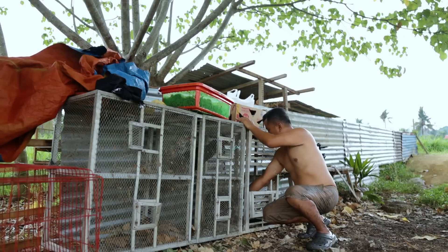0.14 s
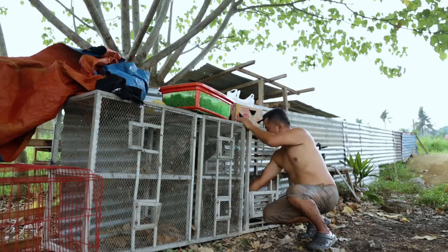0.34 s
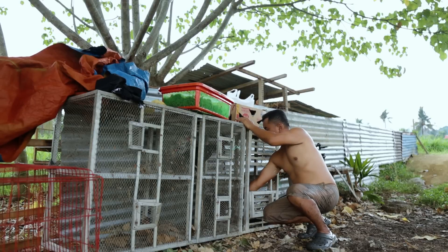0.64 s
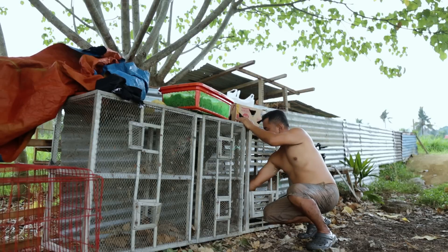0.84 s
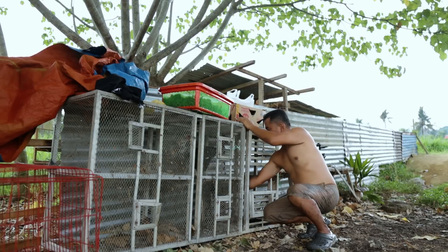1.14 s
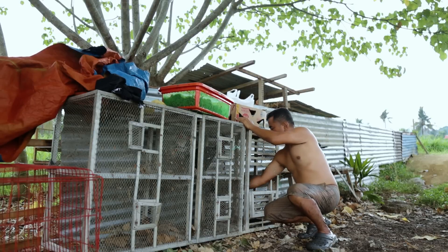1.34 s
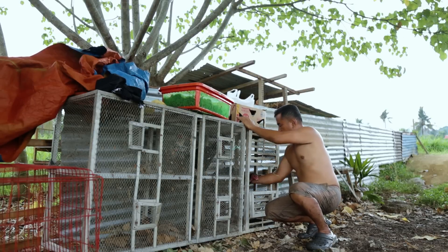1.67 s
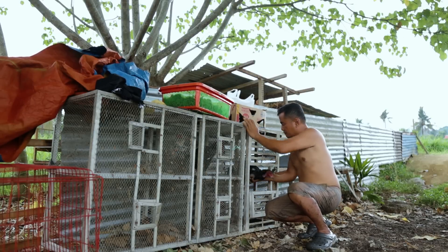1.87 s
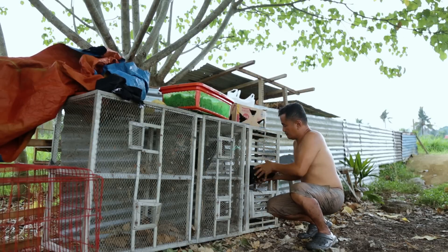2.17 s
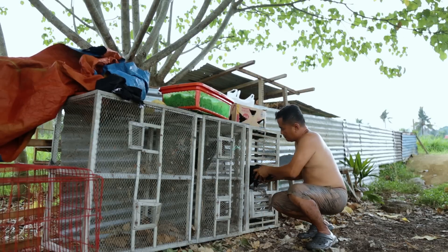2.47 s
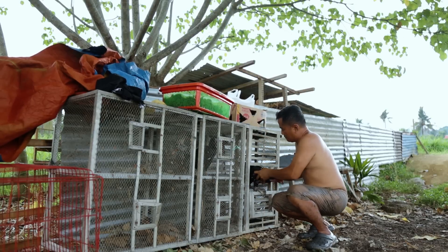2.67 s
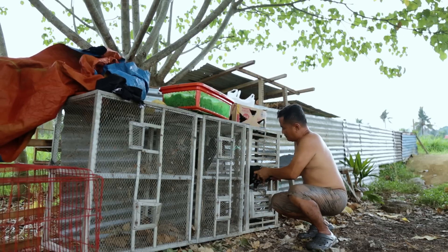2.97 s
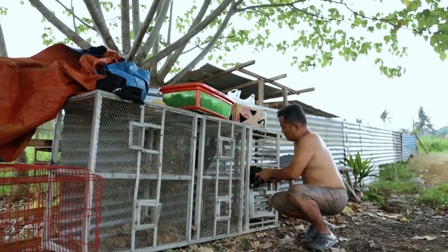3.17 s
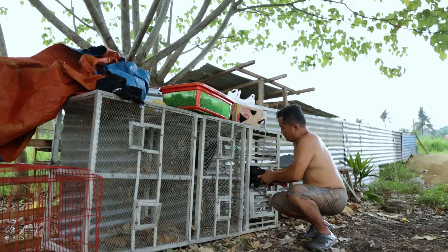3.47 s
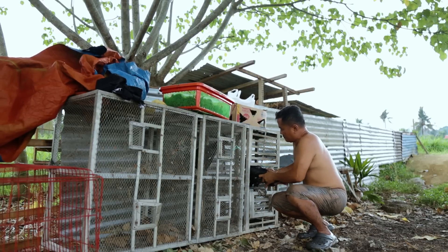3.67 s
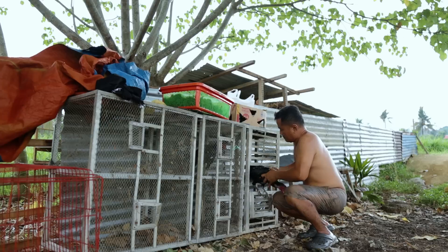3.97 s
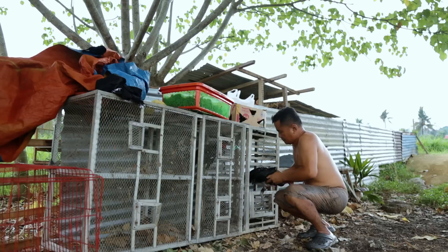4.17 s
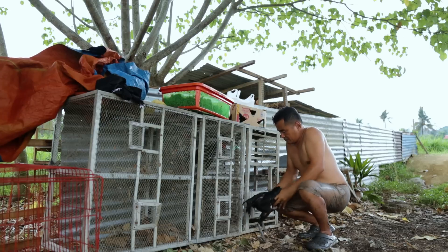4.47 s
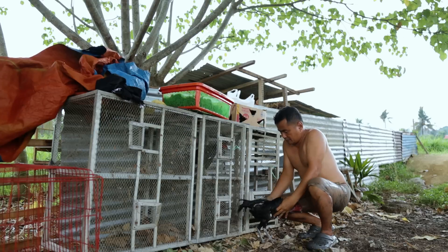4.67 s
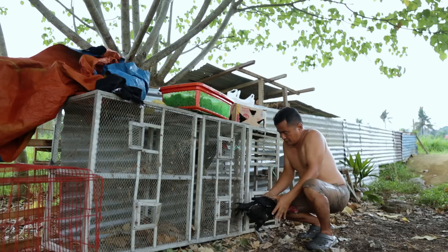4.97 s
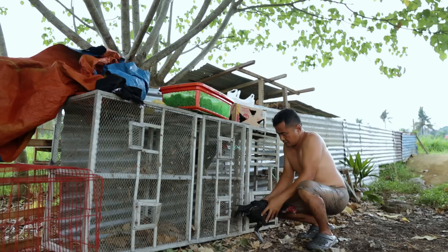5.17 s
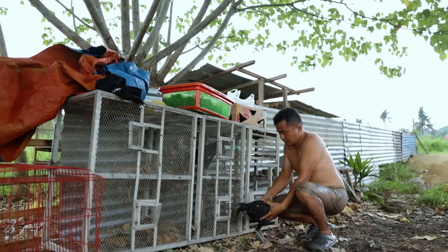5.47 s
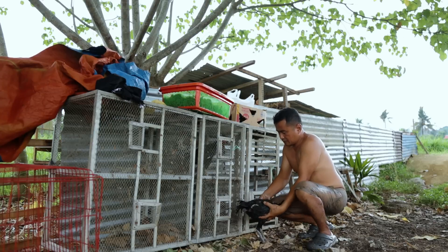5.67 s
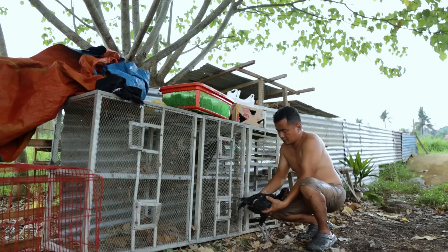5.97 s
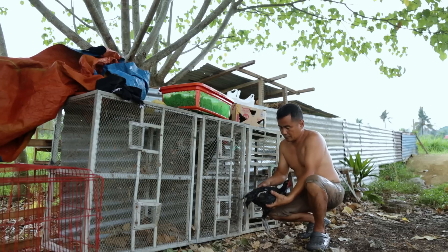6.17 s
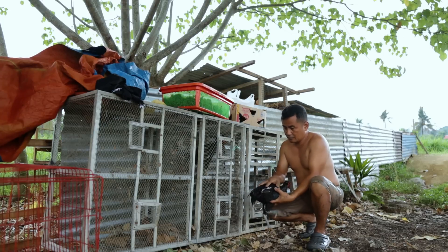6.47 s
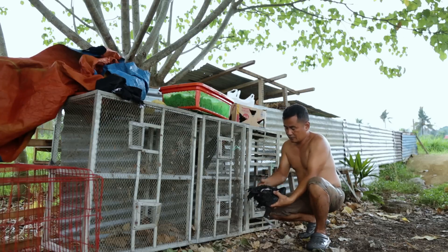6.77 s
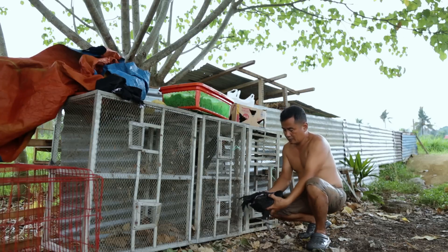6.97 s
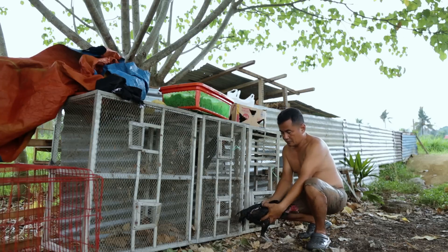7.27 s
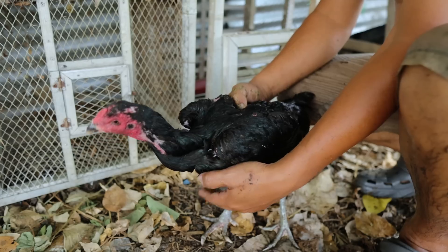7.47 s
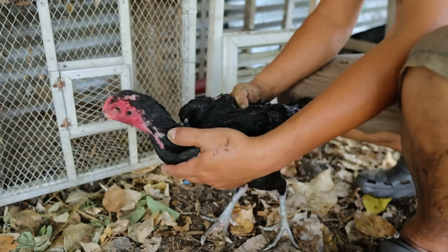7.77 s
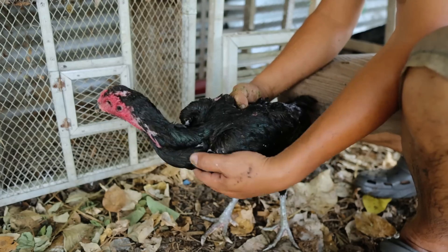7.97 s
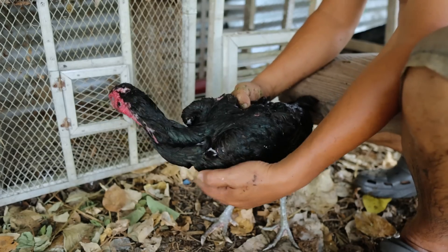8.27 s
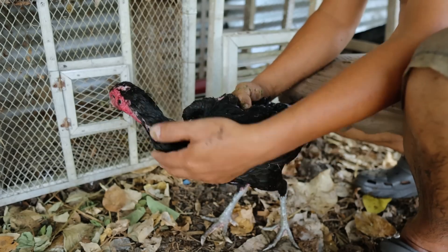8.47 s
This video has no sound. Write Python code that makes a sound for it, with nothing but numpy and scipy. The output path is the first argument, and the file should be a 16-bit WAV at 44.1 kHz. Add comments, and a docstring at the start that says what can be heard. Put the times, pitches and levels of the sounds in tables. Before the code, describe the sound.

Open farmyard with a soft hush and faint low gusts at the microphone. At 0.1 s a strong dull knock sounds on a coop frame, with low hen grumbles, a faint cluck and a distant songbird phrase. More knocks come at 0.5 s. From 0.6 s short squawks begin, with scraping feathers and feet, growing by 1.2 s into louder rasping squawks several times a second, many led by a thin whistle. Bright mesh clicks rattle around 1, 2.1, 3.9 and 4.1 s. From 4.8 to 5.2 s come low grumbles and a cluck, then a long squawk at 5.3 s over far rasping chatter. Clucks follow at 5.9 and 6.1 s, leaves brush at 6.3 s, and two joined hoarse squawks sound at 6.5 s. Knocks come around 7.1 to 7.4 s. Finally, drier close clucks and one tiny squawk mix with other fowl and high chirps until 8.6 s.

```python
"""Knocks and low grumbles open the scene as a chicken is pulled out of a wire-mesh coop and held by hand.
It soon breaks into rasping squawks, many led by a whistle, among mesh clicks and rustling feathers,
then gives short clucks between later squawks while leaves brush and other birds call across the yard.
Its voice is source and filter: a syrinx buzz with a second, slower vibration drives throat and beak.
Contacts are filtered impulses with rattle, rustles clumped noise, other calls gliding harmonics."""
import sys
import numpy as np
from scipy import signal
from scipy.io import wavfile
from scipy.ndimage import uniform_filter1d, map_coordinates

SR = 44100
rng = np.random.default_rng(int(sys.argv[2]) if len(sys.argv) > 2 else 0)


def int16_out(signal):
    """Quantize to a 16-bit WAV file."""
    q = np.round(np.clip(np.atleast_2d(signal).T, -1, 1) * 32767)
    wavfile.write(sys.argv[1], SR, q.astype(np.int16))


N = 380141
EDGE_HZ = 15900  # upper edge of the whole band


def gain_of(db):
    """Level definition: decibels to amplitude ratio."""
    return 10 ** (np.asarray(db) / 20)


def evened(x):
    """Normalisation: scales a signal to rms 1."""
    return x / np.sqrt(np.mean(x ** 2) + 1e-20)


def read(points, hz):
    """Interpolation: reads a spectrum table on a log-frequency axis."""
    f, value = np.transpose(points)
    return np.interp(np.log(hz + 1), np.log(f), value)


def add(mix, s, sound):
    """Superposition: mixes a sound in at time s."""
    part = mix[max(round(s * SR), 0):][:len(sound)]
    part += sound[:len(part)]


def coloured(x, points, size=4096):
    """Minimum phase: a causal filter whose phase follows from its log gain by Hilbert transform."""
    log_gain = np.log(gain_of(read(points, abs(np.fft.fftfreq(size, 1 / SR)))))
    taps = np.fft.ifft(np.exp(np.conj(signal.hilbert(log_gain)))).real
    return signal.fftconvolve(x, taps[:size // 2])[:len(x)]


def wander(count, hz):
    """Random modulation: straight lines between normal deviates drawn hz times a second."""
    knots = rng.standard_normal(count // 8 + 4)
    return map_coordinates(knots, [np.arange(count) * hz / SR], order=1)


def steadied(x, size=400):
    """Level control: divides by the short-time rms so that the level holds at 1."""
    power = uniform_filter1d(uniform_filter1d(x ** 2, size), size)
    return x / np.sqrt(abs(power) + 1e-12)


def faded(x, size=130):
    """Windowing: linear ramps of size samples soften both ends."""
    i = np.arange(len(x))
    return x * np.clip(np.minimum(i, i[::-1]) / size, 0, 1)


def ramp(x):
    """Linear envelope: falls from 1 at x = 0 to nothing at x = 1."""
    return np.clip(1 - x, 0, 1)


def swelling(swells):
    """Cosine-tapered envelope: a level that rises and falls for each (start, end, dB)."""
    swell = np.zeros(N)
    for start, end, db in swells:
        window = signal.windows.tukey(max(int((end - start) * SR), 2), .6)
        add(swell, start, gain_of(db) * window)
    return swell


def resonate(x, hz, width):
    """Heterodyne resonator: shifts hz to zero, low-passes and shifts back, with gain 1 at the peak."""
    turn = np.exp(2j * np.pi * np.cumsum(hz * np.ones(len(x))) / SR)
    r = np.exp(-np.pi * width / SR)
    return 2 * (turn * signal.lfilter([1 - r], [1, -r], x / turn + 1e-18)).real


def crackle(swells, colour, clump_db, grain_db):
    """Friction noise: many small contacts, clumped by slow and fast random level changes."""
    level_db = clump_db * wander(N, 130) + grain_db * wander(N, 1500)
    grains = rng.standard_normal(N) * gain_of(level_db)
    return swelling(swells) * evened(coloured(grains, colour))


def air():
    """Broadband noise: the hush of the yard, and low turbulence of gusts at the microphone."""
    # yard hush: f/Hz, relative level/dB
    hush_colour = [(15, -23), (25, -21), (70, 3), (463, -5), (607, -10), (775, -6.5), (936, 0), (1560, -14),
                   (3520, -13.5), (6380, -25), (7110, -15.5), (7920, -25.5), (9840, -19), (11600, -32),
                   (16000, -41.5)]
    # breeze rumble: f/Hz, relative level/dB
    rumble_colour = [(15, -36), (40, 5.5), (62, -6.5), (90, -27), (200, -38), (600, -69)]
    # gusts: start t/s, end t/s, level/dB before the cut below
    gusts = [(0.52, .8, -43), (1.55, 2.1, -49), (2.1, 2.85, -41), (3.15, 3.6, -45), (4.1, 4.35, -47),
             (5.1, 5.3, -48), (6.12, 6.5, -40), (7.12, 7.44, -39.5), (7.72, 7.92, -43), (8.02, 8.35, -39)]
    calm_db, rumble_cut_db = -56.5, -2.0  # the rumble between gusts is cut too
    hush_db = -45.43 + 2.8 * wander(N, 4.5)
    hush = evened(coloured(rng.standard_normal(N), hush_colour)) * gain_of(hush_db)
    rumble = evened(coloured(rng.standard_normal(N), rumble_colour, size=32768))
    return hush + rumble * (gain_of(calm_db) + swelling(gusts)) * gain_of(rumble_cut_db)


def echoes(x):
    """Specular reflection: single delayed copies off ground, coop and tin fence."""
    # reflections: delay t/s, level/dB
    reflections = [(.0058, -41), (0.0121, -22), (0.019, -24)]
    out = np.zeros(N)
    for delay, db in reflections:
        add(out, delay, gain_of(db) * x)
    return out


def yard_tail(x):
    """Diffuse reverberation: scatter from trees and sheds, each band dying at its own speed."""
    # reverberation time: f/Hz, T60 t/s
    tail_t60 = [(300, 0.12), (1000, 0.19), (4000, 0.21), (12000, 0.07)]
    hz, t, z = signal.stft(rng.standard_normal(SR), SR, nperseg=256)
    build_up = 1 - np.exp(-t / 0.0057)
    z = z * gain_of(-60 * t / read(tail_t60, hz)[:, None]) * build_up
    tail = signal.istft(z, SR)[1]
    return signal.fftconvolve(x, tail / np.linalg.norm(tail))[:N]


def birds(calls, overtone_db, waver, waver_hz):
    """Harmonic series: whistles of randomly wavering pitch, each overtone overtone_db above the last."""
    out = np.zeros(N)
    for s, hz, level_db in calls:
        wavering_hz = hz * (1 + waver * wander(len(hz), waver_hz))
        phase = 2 * np.pi * np.cumsum(wavering_hz) / SR
        tone = sum(gain_of(overtone_db * k) * np.sin((k + 1) * phase) for k in range(4))
        add(out, s, faded(evened(tone) * gain_of(level_db)))
    return out


def notes(rows, edge_db):
    """Quadratic glide: each note bends through three pitches, its level changed by edge_db at the ends."""
    for start, length, first_hz, middle_hz, last_hz, db in rows:
        u = np.linspace(-1, 1, int(length * SR))
        slope_hz = (last_hz - first_hz) / 2
        bend_hz = (first_hz + last_hz) / 2 - middle_hz
        yield start, middle_hz + slope_hz * u + bend_hz * u ** 2, db + edge_db * u ** 2


def phrase(start, db):
    """Frequency glide: a songbird's two flicks and rising slur as start, pitch and level."""
    # the phrase: t/s from its start, pitch f/Hz, relative level/dB
    phrase_points = [(0, 2660, -23), (.015, 3290, 10.5), (.035, 2480, -21), (.056, 3150, 7),
                     (.078, 2100, -10), (.11, 2220, -9), (.155, 2780, 2), (.188, 3000, -18)]
    s, hz, level_db = np.transpose(phrase_points)
    t = np.arange(0, s[-1], 1 / SR)
    return start, np.interp(t, s, hz), db + np.interp(t, s, level_db)


def songbirds():
    """Nearly pure tones: far songbirds' phrases and single chirps."""
    # sung phrases: start t/s, level/dB
    sung_phrases = [(0.309, -49), (5.939, -44.5)]
    # chirps: start t/s, length t/s, first f/Hz, middle f/Hz, last f/Hz, level/dB
    chirps = [(7.265, 0.032, 3200, 2530, 2150, -49), (7.44, 0.088, 5000, 5400, 6500, -64),
              (7.62, .11, 4970, 5420, 6540, -68), (7.86, 0.11, 4970, 5280, 6850, -56),
              (8.2, 0.098, 4900, 5340, 6700, -56.5), (8.52, .098, 4970, 5500, 6500, -59)]
    song = [phrase(*row) for row in sung_phrases] + list(notes(chirps, edge_db=0))
    return birds(song, overtone_db=-39, waver=0.014, waver_hz=400)


def other_fowl():
    """Harmonic tones: steady far fowl, and nearer fowl with a rougher pitch."""
    # far fowl: start t/s, length t/s, first f/Hz, middle f/Hz, last f/Hz, mid-note level/dB
    far_notes = [(0.32, 0.11, 1156, 1138, 1084, -46.5), (6.33, 0.96, 934, 977, 957, -44),
                 (7.1, 1.2, 1796, 1720, 1680, -56)]
    # nearer fowl: start t/s, length t/s, first f/Hz, middle f/Hz, last f/Hz, mid-note level/dB
    nearer_notes = [(5.77, .11, 847, 1250, 1340, -47), (7.44, .125, 1295, 1540, 1360, -40),
                    (7.565, 0.09, 1395, 1510, 1386, -36), (7.695, 0.068, 680, 982, 760, -32),
                    (8.04, 0.12, 880, 1273, 1090, -41), (8.35, .045, 1030, 1130, 1300, -41),
                    (8.395, 0.12, 1720, 1628, 1490, -29)]
    far = birds(notes(far_notes, edge_db=-5), overtone_db=-7.0, waver=0.0142, waver_hz=249)
    return far + birds(notes(nearer_notes, edge_db=-8), overtone_db=-15, waver=0.079, waver_hz=620)


def chatter():
    """Band-shaped noise: far rasping bird chatter."""
    # chatter: start t/s, end t/s, level/dB
    bursts = [(4.95, 5.32, -52.5), (5.42, 5.62, -53), (5.66, 5.85, -51)]
    # its spectrum: f/Hz, relative level/dB
    burst_colour = [(2000, -34), (3700, -5), (4700, 5), (5500, 0), (6800, -23), (12000, -47)]
    return crackle(bursts, burst_colour, clump_db=1.5, grain_db=1.5)


def leaves():
    """Friction noise: a brush through dry leaves."""
    # brush: start t/s, end t/s, level/dB
    brushes = [(6.25, 6.37, -32)]
    # its spectrum: f/Hz, relative level/dB
    leaf_colour = [(300, -22), (1000, -19), (1700, 7), (2300, -1.5), (3000, -13), (4500, -11), (7000, -19),
                   (15000, -44)]
    return crackle(brushes, leaf_colour, clump_db=2.5, grain_db=1.5)


def rustles():
    """Friction noise: feathers and feet scraping in the struggle."""
    # scrapes: start t/s, end t/s, level/dB
    scrapes = [(0.604, 0.77, -37), (0.876, 1.02, -30), (1.077, 1.496, -33), (1.475, 1.565, -28.5),
               (1.55, 1.75, -39.5), (1.857, 2.007, -36), (2.04, 2.256, -37), (3.56, 3.76, -42.5),
               (7.4, 7.776, -51), (8.47, 8.53, -33)]
    # their spectrum: f/Hz, relative level/dB
    scrape_colour = [(150, -11.5), (600, -0.5), (1200, 1), (1900, -4), (3000, -2.5), (4400, -4.5),
                     (7000, -18), (15000, -31)]
    return crackle(scrapes, scrape_colour, clump_db=7.0, grain_db=3.5)


def strike(colour, t60, ring, count=9000):
    """Impact excitation: an impulse and an exponentially dying rattle, filtered to peak 1."""
    t = np.arange(count) / SR
    force = ring * rng.standard_normal(count) * gain_of(-60 * t / max(t60, .005))
    force[0] += 1
    sound = coloured(force, colour)
    return sound / abs(sound).max()


def coop():
    """Impact sound: dull knocks on the frame, sharp clicks of claws and wire mesh."""
    # knocks: t/s, peak level/dB before the 4 dB lift, relative treble/dB, T60 t/s
    knocks = [(0.08, -37, 4, 0.03), (0.137, -5, -2.5, 0.034), (0.514, -18.5, -8, 0.035),
              (0.525, -20, -7, 0.018), (2.057, -20, -4, 0.11), (6.025, -29, -1, 0.023),
              (7.134, -19, -8, 0.042), (7.149, -19, 19, 0.012), (7.236, -21, -3, 0.025),
              (7.403, -30, 0, 0.051)]
    # knock spectrum: f/Hz, relative level/dB
    knock_colour = [(80, -27), (200, 0), (450, 9), (700, 1.5), (1000, 12), (1600, -5.5), (3100, -2.5),
                    (4500, -20), (15000, -52)]
    # clicks: t/s, peak level/dB before the 6 dB lift, T60 t/s
    clicks = [(0.546, -38.5, 0.078), (0.9273, -23, 0.035), (0.972, -14, 0.024), (1.491, -26, 0.36),
              (2.0624, -10.5, 0.094), (2.072, -29, 0.089), (2.1276, -28.5, 0.037), (2.1947, -18.5, 0.068),
              (2.3477, -19, 0.12), (3.5376, -22, 0.062), (3.8609, -10.5, 0.039), (3.896, -25.5, 0.07),
              (4.1225, -14, 0.055), (4.1576, -29.5, 0.083), (8.4818, -30, 0.055)]
    # click spectrum: f/Hz, relative level/dB
    click_colour = [(300, -4.5), (1000, 4), (2000, -1.5), (4100, 9), (5600, 8), (7500, -7), (10500, -7),
                    (15000, -20.5)]
    out = np.zeros(N)
    for s, db, treble_db, t60 in knocks:
        colour = [(hz, level + treble_db * (hz > 1500)) for hz, level in knock_colour]
        add(out, s, gain_of(db + 4) * strike(colour, t60, ring=0.194))
    for s, db, t60 in clicks:
        add(out, s, gain_of(db + 6) * strike(click_colour, t60, ring=0.51))
    return out


def syrinx(hz, rasp):
    """Coupled oscillation: membranes buzz; with rasp a slower vibration joins and drifts out of step."""
    count = len(hz)
    warble = .055 * (rasp + .15) * wander(count, 110)
    jitter = 0.067 * (rasp + 0.17) * wander(count, 482.0)
    turns = np.cumsum(hz * (1 + warble + jitter)) / SR
    buzz = sum((k * hz < EDGE_HZ) * np.cos(2 * np.pi * k * turns) for k in range(1, 44))
    # locked at half the pitch it makes cycles strong-weak; unlocked it makes the voice hoarse
    drift_turns = np.cumsum(hz * .5 * rasp ** 2 * wander(count, 90.1)) / SR
    slow_turns = (turns + drift_turns) / 2
    beating = 1.33 * rasp * (1 + 1.07 * wander(count, 114.0)) * np.cos(2 * np.pi * slow_turns)
    shimmer = 0.87 * rasp * wander(count, 412.4)
    pulses = evened(buzz) * (1 + beating + shimmer)
    # turbulent air escapes each time the membranes open
    puffs = evened((0.24 + np.exp(-(turns % 1) / .5)) * rng.standard_normal(count))
    return pulses + (rasp ** 2 + 0.14) * puffs


def scattered(x, share, decay=.003, count=600):
    """Scattering: bars and hands close to the beak smear each pulse over a few milliseconds."""
    taps = rng.standard_normal(count) * np.exp(-np.arange(count) / SR / decay)
    return x + share * signal.fftconvolve(x, taps / np.linalg.norm(taps))[:len(x)]


def throat_mode(drive, hz, stage_width):
    """Cascaded resonance: two equal resonators in series steepen the skirts."""
    return resonate(resonate(drive, hz, stage_width), hz, stage_width)


def hen_call(s, hz, level_db, upper_db, rasp):
    """Source and filter: the syrinx sounds through throat and beak."""
    # fixed modes of windpipe and mouth: f/Hz, half of each stage's width f/Hz, level/dB
    throat_modes = [(610, 130, -6), (2480, 250, -19), (2870, 250, -17), (3220, 300, -10), (3520, 380, -8),
                    (4400, 400, -23), (5000, 400, -20), (5550, 400, -21), (7100, 900, -30)]
    # sound radiated from the beak: f/Hz, relative level/dB
    beak_colour = [(150, -22), (330, -6), (450, -11), (600, -3), (850, 0), (1350, 2), (1800, -2), (2800, 2),
                   (3450, 1), (4150, -5), (5300, -2), (7000, -8), (15000, -13)]
    # the main resonance climbs with pitch up to the squawks and sits lower again for the whistles:
    # pitch f/Hz, resonance f/Hz
    main_tuning = [(280, 580), (420, 590), (520, 900), (610, 970), (700, 1020), (820, 940), (1120, 850)]
    # how the bird is held shapes its throat: t/s, main resonance level/dB, neck resonance level/dB
    posture = [(0, 6, -19), (1.1, -3.5, -7.5), (1.65, -12.5, -10.5), (1.8, 7, -4), (2.5, 2.5, -13),
               (3.6, 8.5, -17.5), (4.5, 5, -15), (5.3, 16, 4), (6.7, 0.5, 0), (7.5, 34, -25)]
    rasp = np.clip(rasp, 0, 1)
    drive = syrinx(hz, rasp)
    main_hz = read(main_tuning, hz)
    held_s, *strengths = np.transpose(posture)
    main_db, neck_db = (np.interp(s, held_s, db) for db in strengths)
    voice = gain_of(main_db) * throat_mode(drive, main_hz, stage_width=660)
    voice += gain_of(neck_db) * throat_mode(drive, 1800, stage_width=600)
    for mode_hz, width, db in throat_modes:
        voice += gain_of(db) * throat_mode(drive, mode_hz, 2 * width)
    voice = coloured(voice, beak_colour)
    # a nearly shut beak passes little above its resonance
    divide_hz = min(1.45 * main_hz.max(), 1550)
    low, high = (signal.sosfiltfilt(signal.butter(5, divide_hz, side, fs=SR, output="sos"), voice)
                 for side in ("low", "high"))
    low, high = scattered(low, share=.35), scattered(high, share=.9)
    # the upper resonances come out as the bird strains
    sound = steadied(low) + gain_of(upper_db) * steadied(high)
    flutter_db = 2.5 * rasp * wander(len(hz), 170)
    return s, faded(sound * gain_of(level_db + flutter_db), size=80)


def grumble_gesture(start, length, hz, db, upper_db):
    """Parabolic envelope: a grumble swells and fades while its pitch sinks a little."""
    edge_db, sag, rasp = -15, 0.104, 0.58  # sag is a share of the pitch
    u = np.arange(0, length, 1 / SR) / length
    return start, hz * (1 - sag * (u - .5)), db + edge_db * (2 * u - 1) ** 2, upper_db, rasp


def cluck_gesture(start, lead, pop, lead_hz, pop_hz, last_hz, db, lead_db, upper_db):
    """Two-stage gesture: a soft lead-in on an arch of pitch drops into a loud pop and dies, falling."""
    onset_s, snap_s, tail_s = .01, .005, .016
    onset_db, tail_db, rasp = -18, -23, 0.12
    crest, bend = .45, 1.8  # share of the lead-in at the highest pitch, exponent of the arch
    scoop = .25  # share of the pitch by which the lead-in starts flat
    length = lead + pop + tail_s
    t = np.arange(0, length, 1 / SR)
    from_crest = abs((np.minimum(t / lead, 1) - crest) / (1 - crest))
    arch_hz = lead_hz * (pop_hz / lead_hz) ** (from_crest ** bend)
    lead_in_hz = arch_hz * (1 - scoop * ramp(t / lead) ** 2)
    hz = np.where(t < lead, lead_in_hz, np.interp(t, [lead, length], [pop_hz, last_hz]))
    level_db = db + onset_db * ramp(t / onset_s) + lead_db * ramp(1 + (t - lead) / snap_s)
    level_db = level_db + tail_db * ramp((length - t) / tail_s)
    return start, hz, level_db, upper_db, rasp


def squawk_gesture(start, length, rise, held_hz, sag, last_hz, db, closing_db, early_db, late_db, rasp):
    """Gliding gesture: a squawk scoops up, holds with a tremble, then swells or dips as its pitch drops."""
    rise_db, rise_dull_db, scoop = -13.5, -22, .2  # it starts soft, dull and flat in pitch
    close_s, close_bend, close_clears = .05, 1.3, 0.35  # pitch drops and clears as the beak closes
    release_s, release_db = .018, -23.5
    droop, droop_s = 0.236, 0.01606  # the pitch collapses as the air runs out
    t = np.arange(0, length, 1 / SR)
    u, left = t / length, length - t
    opening = ramp(t / max(rise, 1 / SR))
    closing = ramp(left / close_s) ** close_bend
    # the pitch takes 1.4 times as long as the level to rise
    pitch_opening = ramp(t / max(1.4 * rise, 1 / SR))
    hz = held_hz * (1 - scoop * pitch_opening ** 2) * (1 - sag * (u - .5))
    hz = hz * (1 + .022 * wander(len(t), 35))
    hz = (hz + (last_hz - hz) * closing) * (1 - droop * ramp(left / droop_s))
    swell_or_dip_db = closing_db * np.exp(-((left - 0.022) / 0.014) ** 2 / 2)
    tremble_db = 1.5 * wander(len(t), 70)
    overshoot_db = 1.5 * np.exp(-((t - rise) / 0.0062) ** 2 / 2)  # as the rise ends
    level_db = db + rise_db * opening + swell_or_dip_db + release_db * ramp(left / release_s)
    level_db = level_db + tremble_db + overshoot_db
    upper_db = early_db + (late_db - early_db) * u + rise_dull_db * opening - swell_or_dip_db / 2
    return start, hz, level_db, upper_db, rasp * (1 - close_clears * closing)


def whistle_gesture(start, length, top_hz, db, upper_db, rasp):
    """Register flip: a whistle scoops up, holds and falls on a shallow arch of pitch."""
    rise_s, fall_s, rise_db, fall_db = .022, 0.0102, -24.5, -7.5
    arch, scoop, swell_db = .06, .08, 2.5  # shares of the pitch; growth from start to end
    t = np.arange(0, length, 1 / SR)
    opening = ramp(t / rise_s)
    hz = top_hz * (1 - arch * (2 * t / length - 1) ** 2) * (1 - scoop * opening ** 2)
    level_db = db + swell_db * (t / length - .5)
    level_db = level_db + rise_db * opening + fall_db * ramp((length - t) / fall_s)
    return start, hz, level_db, upper_db, rasp


def chicken():
    """Superposed gestures: grumbles, clucks, squawks and whistles share one vocal tract."""
    # All levels stand before the 1.68 dB cut; "upper" is the upper resonances' relative level.
    # low grumbles, beak shut: start t/s, length t/s, pitch f/Hz, level/dB, upper/dB
    grumbles = [(0.002, 0.05, 303, -26.5, -13.5), (0.098, 0.085, 299.8, -22, -23),
                (0.207, 0.051, 308.5, -28.5, -20), (0.435, .056, 299, -26, -20),
                (4.803, 0.055, 278.6, -24.5, -8.5), (4.962, 0.063, 302.7, -24, -6.5),
                (5.158, 0.059, 259.5, -24.5, -8.5), (7.168, .066, 366.4, -23.5, -3.5),
                (7.441, 0.064, 300, -33, -4)]
    # short clucks: start t/s, lead-in t/s, pop t/s, lead-in f/Hz, pop f/Hz, last f/Hz,
    # pop level/dB, lead-in relative level/dB, upper/dB
    clucks = [(0.29, 0.022, .01, 472, 382, 270, -32, -1.5, -10),
              (4.906, 0.021, 0.011, 492, 465, 333, -14.5, -9, -16),
              (5.887, 0.027, 0.011, 660, 565, 475, -18, -6, -19.5),
              (6.123, 0.029, 0.016, 693, 600, 486, -9, -15.5, -19.5),
              (6.994, 0.026, 0.0068, 571, 517.5, 418, -8.5, -9.5, -27.5),
              (7.585, 0.0286, 0.023, 644, 329, 234, -13, -18, -28),
              (8.08, 0.032, 0.015, 733, 340, 233, -14, -14, -28),
              (8.3, .035, 0.0073, 671, 293, 224, -18.5, -16, -41)]
    # rasping squawks: start t/s, length t/s, rise t/s, held f/Hz, sag (share of pitch), last f/Hz,
    # level/dB, closing swell (+) or dip (-)/dB, early upper/dB, late upper/dB, rasp (0-1)
    squawks = [(0.625, 0.025, 0.0024, 530, 0.035, 379, -21, 2.5, -24, 5, 0.36),
               (0.792, 0.035, 0.0026, 511, 0.007, 429, -18.5, 2, -21, -15, 0.44),
               (0.885, 0.067, 0.017, 518, -0.033, 435, -17.5, 0, -6.5, -18, 0.48),
               (1.101, 0.059, 0.0021, 579, 0.097, 494, -16, 1.5, -11, -18, 0.3),
               (1.312, .15, 0.0022, 622.5, 0.036, 445, -14.5, 2.5, -6, -9.5, 0.65),
               (1.557, 0.14, 0.029, 642, 0.012, 435, -16.5, -1, -9, -22, 0.43),
               (1.759, 0.091, .03, 616, .05, 450, -14.5, 0.5, -12, -22, 0.39),
               (1.936, .11, 0.026, 508.4, -0.036, 442, -13, -2.5, -9, -18, 0.4),
               (2.155, 0.085, .03, 566, .15, 457, -14, 1.5, -12, -13, 0.47),
               (2.416, 0.14, .026, 629, 0.19, 468, -11.5, 7, -9.5, -14.5, 0.34),
               (2.647, 0.14, 0.021, 620, 0.028, 412, -11, 3.5, -10.5, -4.5, 0.28),
               (2.938, 0.089, 0.0043, 624, -0.011, 478, -11, -1, -2, -8.5, 0.46),
               (3.159, .06, 0.0038, 600.5, 0.16, 332, -16.5, 2.5, -5.5, -17.5, 0.49),
               (3.321, 0.099, 0.0025, 636, -.08, 398, -12.5, -3, -1, -5.5, 0.58),
               (3.613, 0.08, 0.0031, 629.6, 0.12, 434, -10.5, 4, -3, -6.5, 0.31),
               (3.815, 0.088, 0.0034, 617, -0.062, 436, -9.5, -6.5, -2, -10.5, .5),
               (3.969, 0.14, 0.03, 649.5, .06, 510, -11.5, -11.5, -3, -1, 0.42),
               (4.2, 0.15, 0.029, 660.6, -0.042, 581, -12, 0, 6, -6.5, 0.37),
               (4.464, 0.093, 0.023, 690.5, 0.077, 526, -14, -0.5, -6, -17, 0.2),
               (4.642, 0.083, 0.022, 625, 0.012, 406, -20, 10, -5, -11, 0.43),
               (5.298, 0.18, 0.029, 573.3, 0.15, 494, -16.5, 4.5, 9.5, -25, 0.45),
               (5.628, 0.053, 0.0028, 598, .1, 342, -17.5, -1.5, -6, -10, 0.34),
               (6.515, .155, .032, 597, 0.26, 572, -13, -6.5, -9.5, -14, 0.54),
               (6.655, 0.12, 0.0083, 658, 0.019, 494, -10.5, 0, -10, -16, 0.61),
               (7.898, 0.0231, 0.0045, 598, 0.22, 318, -16.5, -0.5, -21, -18, 0.5)]
    # nearly pure whistles, mostly just before a squawk:
    # start t/s, length t/s, pitch f/Hz, level/dB, upper/dB, rasp (0-1)
    whistles = [(0.588, 0.036, 827, -27, -11, .1), (0.753, 0.038, 893, -15, -28, 0.08),
                (1.04, 0.062, 876, -16.5, -20, 0.39), (1.156, 0.079, 928, -9, -20.5, 0.21),
                (1.23, 0.089, 950, -9, -21.5, 0.37), (2.217, 0.069, 1105, -5.5, -15, 0.35),
                (2.902, 0.039, 991, -5, -14, 0.44), (3.127, 0.034, 958, -2, -31, 0.17),
                (3.294, 0.031, 1006, -7.5, -18, 0.47), (3.526, 0.031, 994, -2.5, -27, 0.17),
                (3.542, 0.081, 850, -13, -7.5, 0.48), (3.784, 0.041, 1063, -3.5, -19.5, 0.29),
                (5.605, 0.025, 978, -12, -19.5, 0), (7.874, 0.031, 889, -10, -38, 0.04)]
    repertoire = [(grumble_gesture, grumbles), (cluck_gesture, clucks),
                  (squawk_gesture, squawks), (whistle_gesture, whistles)]
    hen = np.zeros(N)
    for gesture, rows in repertoire:
        for row in rows:
            add(hen, *hen_call(*gesture(*row)))
    return hen * gain_of(-1.68)


def scene():
    """Direct and reflected sound: chicken and coop near by, other birds across the yard."""
    # ring of the coop after each call: f/Hz, relative level/dB
    ring_colour = [(300, -6), (620, -9), (1100, 0), (1600, -5), (2900, 0), (3650, 9), (4200, -4),
                   (12000, -4)]
    near = chicken() + coop() + rustles() + leaves()
    far = songbirds() + other_fowl() + chatter()
    # the last clucks are close to the microphone, and so drier
    wet_db = np.interp(np.arange(N) / SR, [7.3, 7.4], [0, -7])
    wet = near * gain_of(wet_db)
    ring = gain_of(-24) * yard_tail(coloured(wet, ring_colour))
    far_echo = gain_of(-13) * yard_tail(far)
    return (near + echoes(wet) + ring + far + far_echo + air())[None]


def record(dry, knee=0.29):
    """Soft saturation and band limit: peaks above the knee are rounded, then the top is cut."""
    over = np.maximum(abs(dry) - knee, 0)
    rounded = np.sign(dry) * (abs(dry) - over + (1 - knee) * np.tanh(over / (1 - knee)))
    band_limit = signal.firwin(511, EDGE_HZ, window=("kaiser", 9), fs=SR)
    return signal.oaconvolve(rounded, band_limit[None], "same")


dry = scene()
out = record(dry)
int16_out(out)
```